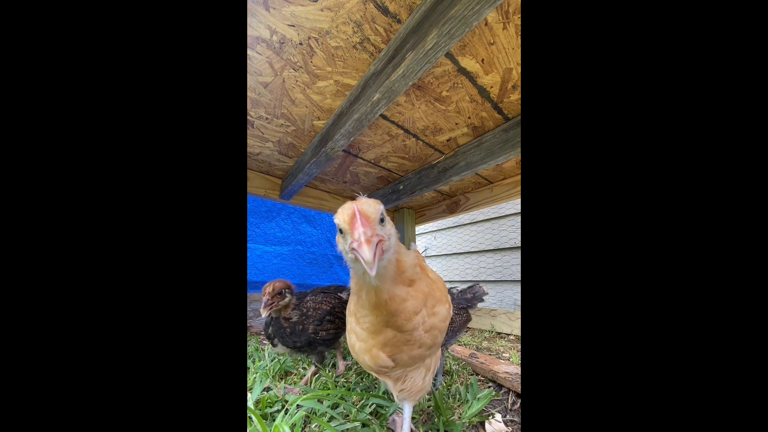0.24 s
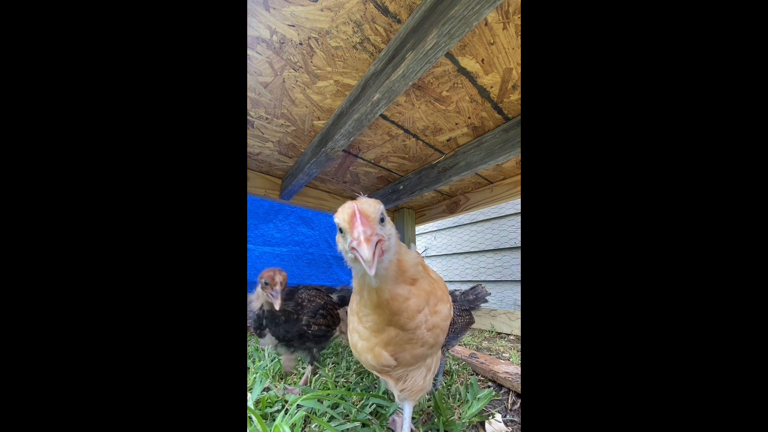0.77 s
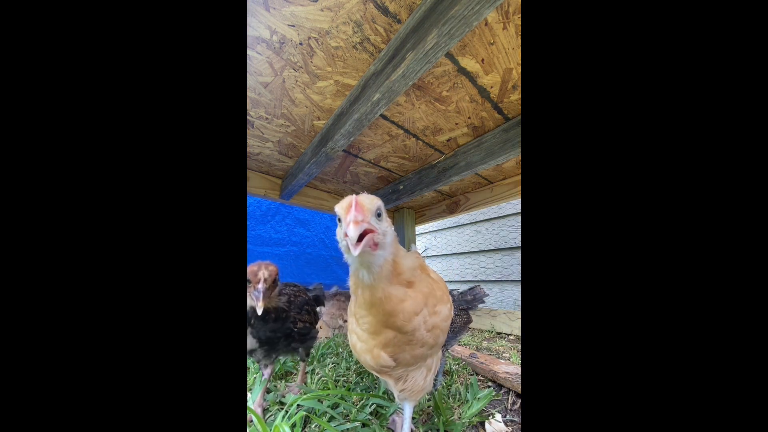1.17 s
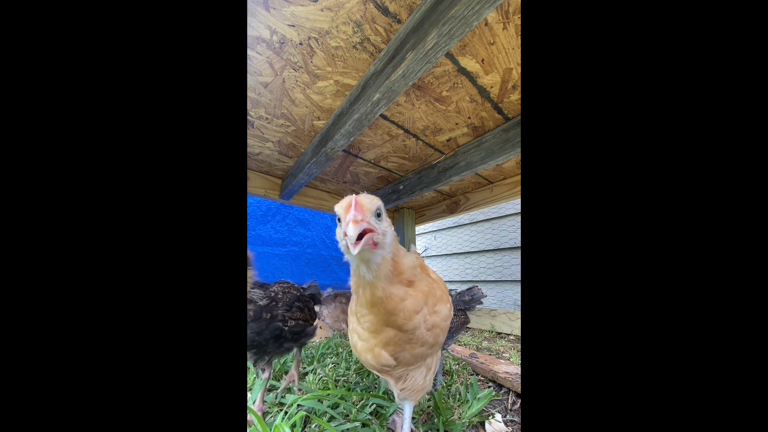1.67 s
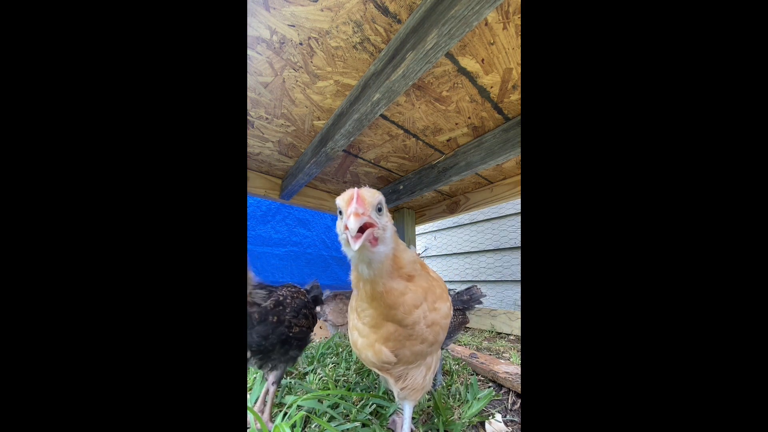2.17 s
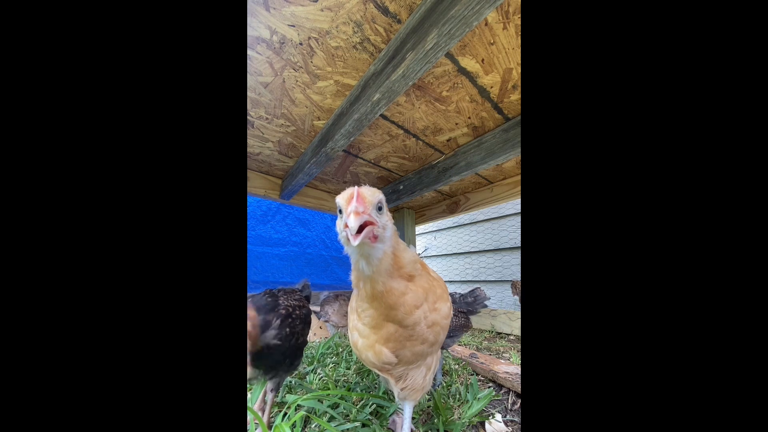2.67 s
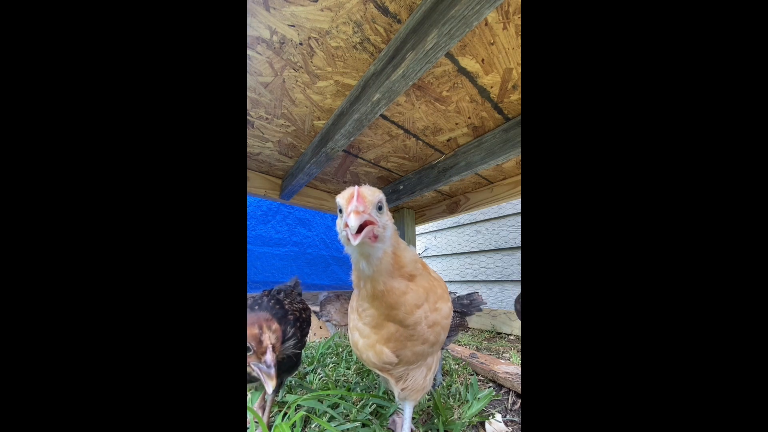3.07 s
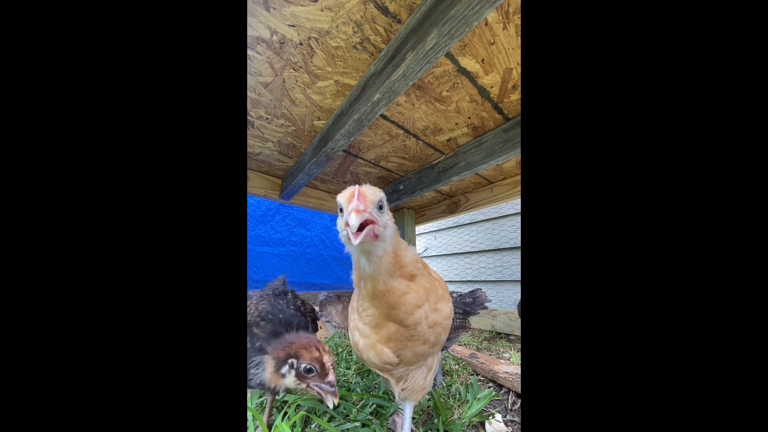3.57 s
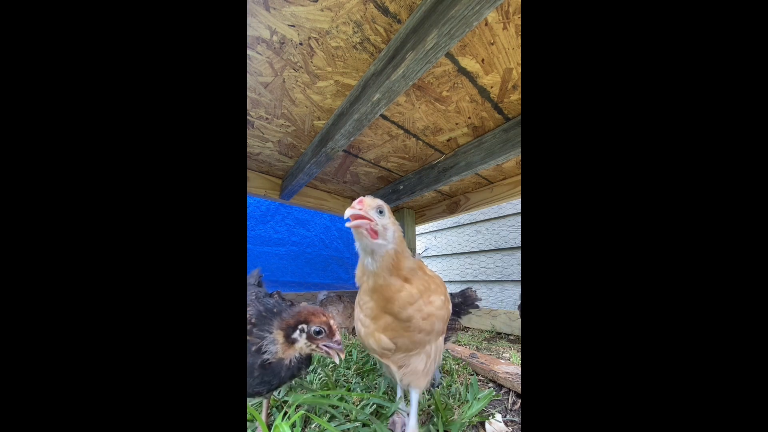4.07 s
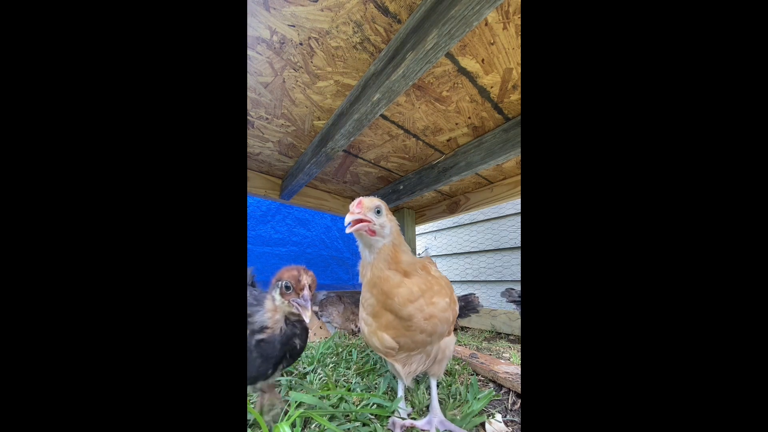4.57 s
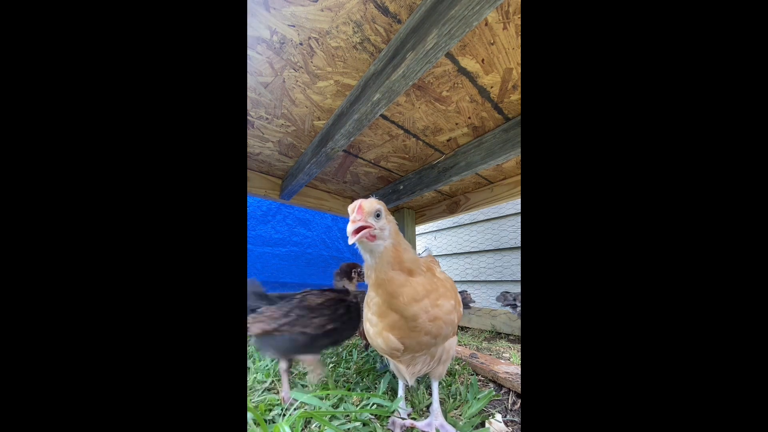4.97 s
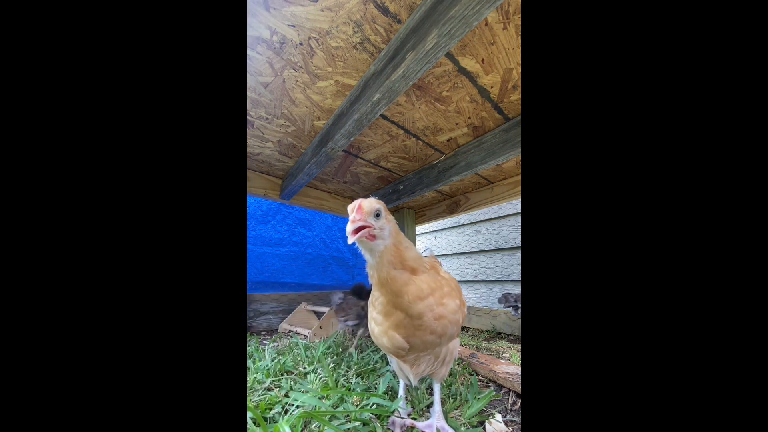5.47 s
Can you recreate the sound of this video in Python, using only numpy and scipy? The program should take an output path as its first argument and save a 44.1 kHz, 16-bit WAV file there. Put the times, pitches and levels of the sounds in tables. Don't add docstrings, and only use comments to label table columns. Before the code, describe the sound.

Young chickens give brief whistled peeps close to the microphone over a steady low hum, with grass rustling and small dry ticks.

```python
import sys
import numpy as np
from scipy import signal
from scipy.fft import rfft, irfft, next_fast_len
from scipy.io import wavfile
from scipy.ndimage import uniform_filter1d

SR = 44100
rng = np.random.default_rng(int(sys.argv[2]) if len(sys.argv) > 2 else 0)


def materialize(psi):
    bounded = np.clip(np.atleast_2d(psi).T, -1, 1)
    quanta = np.round(bounded * 32767).astype(np.int16)
    wavfile.write(sys.argv[1], SR, quanta)


def invert_db(x):
    u = np.asarray(x, float) / 20
    return 10 ** u


N = 252693


def at_hz(points, hz):
    points = np.array(points)
    return np.interp(np.log(hz + 1), np.log(points[:, 0] + 1), points[:, 1])


def drift(rate_hz):
    r = np.exp(-80 * np.pi * rate_hz / SR)
    slow = signal.lfilter([1], [1, -2 * r, r * r], rng.standard_normal(N // 40 + 2002))[2000:]
    return np.interp(np.arange(N) / 40, np.arange(len(slow)), slow / slow.std())


# (frequency [Hz], lead [rad])
PORT_PHASE = [(0, 0), (260, -.3), (690, 2.2), (1200, 2.6), (1720, 1.6), (2600, 2.9), (3880, 1.0),
              (4740, 3.0), (5510, 6.3), (7410, 6.9), (8010, 8.0), (9470, 8.1), (11500, 9.3), (16000, 9.4)]
# (frequency [Hz], likeness [0-1])
PORT_LIKENESS = [(60, 1), (250, 0.72), (520, 0.95), (900, 0.63), (2000, 0.34), (3500, 0.1675), (5000, 0.43),
                 (6500, 0.24), (9000, 0.37), (12000, 0.34)]
# (frequency [Hz], difference [dB])
PORT_BALANCE = [(60, -1.5), (200, -5), (500, -6.5), (1400, 3.5), (3000, -0.5), (5500, -3), (9000, 2.0),
                (12000, 3)]


def diffuse(spectrum, weight, grain_db):
    size = next_fast_len(N)
    hz = np.arange(size // 2 + 1) * SR / size
    grains = rng.standard_normal((2, N)) * invert_db(grain_db * drift(150))
    one, other = rfft(grains, size) * invert_db(at_hz(spectrum, hz)) * weight(hz)
    alike = np.clip(at_hz(PORT_LIKENESS, hz), 0, 1)
    left = alike * one + np.sqrt(1 - alike ** 2) * other
    left = left * np.exp(1j * at_hz(PORT_PHASE, hz))
    tilt = invert_db(at_hz(PORT_BALANCE, hz) / 2)
    out = irfft(np.array([left * tilt, one / tilt]), size)[:, :N]
    return out / out.std()


def seat(mono, pan_db, lag_ms, body_echo=0.86, body_ms=0.15):
    hz = np.arange(len(mono) // 2 + 1) * SR / len(mono)
    echo = 1 + body_echo * np.exp(-2j * np.pi * hz * body_ms / 1000)
    left = echo * np.exp(-2j * np.pi * hz * lag_ms / 1000) * invert_db(pan_db / 2)
    right = 0 * hz + invert_db(-pan_db / 2)
    return irfft(rfft(mono) * np.array([left, right]), len(mono))


# (frequency [Hz], density [dB per Hz])
RUMBLE = [(15, -51.5), (30, -7.5), (45, -2), (80, 4.5), (120, 0), (170, -8), (250, -11), (330, -14.5),
          (470, -12.5), (540, -18), (900, -26.5), (2500, -43.5), (6000, -73.5)]
# (multiple of shaft rate, level [dB])
MOTOR = [(2, -77), (4, -61.5), (5, -66.5), (6, -66.5), (8, -64.5), (10, -75.5), (12, -70), (14, -93),
         (16, -73.5)]
# (multiple of mains rate, level [dB])
MAINS = [(2, -54), (4, -63), (8, -66.5)]
# (frequency [Hz], level [dB])
FAN = [(211.3, -68.5), (254.4, -64.5), (381, -76)]


def cooling_unit(motor_hz=29.505, mains_hz=60.13, rumble_db=-51, wobble_db=1.5, sway_rad=0.46):
    lines = [(k * motor_hz, db) for k, db in MOTOR] + [(k * mains_hz, db) for k, db in MAINS] + FAN
    t = np.arange(N) / SR
    out = invert_db(rumble_db) * diffuse(RUMBLE, np.ones_like, grain_db=1.0)
    waver = np.array([drift(3.36) for _ in range(6)])
    for k, (hz, db) in enumerate(lines):
        turn = 2 * np.pi * (hz * t + rng.random()) + sway_rad * waver[k % 6]
        lead = at_hz(PORT_PHASE, hz)
        tilt = invert_db(at_hz(PORT_BALANCE, hz) / 2)
        ports = np.array([tilt * np.sin(turn + lead), np.sin(turn) / tilt])
        out += np.sqrt(2) * invert_db(db + wobble_db * waver[(k + 3) % 6]) * ports
    return out


# (frequency [Hz], density [dB per Hz])
GRASS = [(450, -3.5), (800, -3.5), (1250, -5.5), (1850, -5.5), (2700, -5), (4200, -9.5), (5500, -10.5),
         (7500, -12), (9000, -14.5), (13200, -16.5), (15000, -17.5)]
# (time [s], level [dB])
YARD = [(0.0, -84.5), (0.4, -75.5), (1.0, -83.5), (1.4, -79.5), (1.901, -77), (2.7, -66.5), (3.05, -66.5),
        (3.5, -67), (4.04, -74), (4.5, -67.5), (5.06, -84), (5.4, -64), (5.73, -67)]
# (time [s], level [dB], low colour over high [dB], rise and fall [ms])
FLICKS = [(0.019, -60, -4, 3.4), (0.045, -59.5, -2.5, 9.8), (0.31, -79.5, -0.5, 7.8),
          (0.588, -69.5, 2.5, 28), (0.823, -75, -3, 16), (1.042, -80.5, -12, 5), (1.154, -69, 4, 5.1),
          (1.282, -73, -11, 5), (1.308, -67, 4, 27), (1.987, -70.5, -8, 9), (2.299, -74.5, -12, 5),
          (2.366, -72, -6, 11), (2.466, -60, -2, 16), (2.799, -65, 2, 6.8), (2.853, -73.5, -10.5, 6.8),
          (3.599, -67.5, -1, 22), (3.655, -62, -5, 5), (3.806, -63, -5.5, 3.8), (4.385, -71, -11, 6.4)]
# (time [s], level [dB], high colour over middle [dB], rise [ms], fall [ms])
STEPS = [(0.675, -74, 4, 43, 16), (0.908, -69, -4.5, 24, 76), (0.99, -80, -2.5, 60, 82),
         (1.622, -59, -11, 173, 54), (1.885, -74.5, -30, 14, 11), (1.957, -73, -9, 4.4, 7.6),
         (4.62, -68.5, -17, 10, 10), (2.024, -61.5, 3, 5.7, 15), (2.156, -64, -27, 12.6, 104),
         (2.686, -67, -23, 4.6, 11), (2.962, -58.5, -39, 11, 30), (3.399, -62, 2, 19, 22),
         (3.735, -60, -4.5, 24, 60), (3.924, -68, -2, 11, 4.4), (4.153, -60.5, -3.5, 58, 33),
         (4.212, -65, -11, 80, 6.4), (4.268, -69.5, 4, 66, 5), (4.375, -65, -3.5, 34, 13),
         (4.55, -63, -7.5, 82, 150), (4.81, -59, -3.5, 32, 83), (5.001, -48.5, -12, 43, 24),
         (5.142, -63, -1, 37, 32), (5.304, -62, -2.5, 66, 28), (5.362, -61.5, -1.5, 9.1, 49),
         (5.493, -64.5, 1, 9.3, 11)]


def below(hz, edge_hz):
    return 1 / (1 + (hz / edge_hz) ** 4)


def grass(yard_middle_db=-3, yard_high_db=-13, flick_middle_db=-14, step_low_db=-2):
    t = np.arange(0, N + 32, 32) / SR
    s, yard_db = np.transpose(YARD)
    colours_db = np.array([[0], [yard_middle_db], [yard_high_db]])
    power = invert_db(2 * (np.interp(t, s, yard_db) + colours_db))
    rustles = [(s, db + low_db, db + flick_middle_db, db, ms, ms) for s, db, low_db, ms in FLICKS]
    rustles += [(s, db + step_low_db, db, db + high_db, rise, fall) for s, db, high_db, rise, fall in STEPS]
    for s, low_db, middle_db, high_db, rise_ms, fall_ms in rustles:
        away = 1000 * np.where(t < s, (s - t) / max(rise_ms, 1), (t - s) / max(fall_ms, 1))
        power += invert_db(2 * (np.array([[low_db], [middle_db], [high_db]]) - 6 * away))
    close = sum(invert_db(db - low_db - 1000 * abs(t - s)) for s, db, low_db, _ in FLICKS)
    times = np.arange(N) / SR
    low, middle, high = (np.interp(times, t, np.sqrt(p)) for p in power)

    low_noise = diffuse(GRASS, lambda hz: np.sqrt(below(hz, 1500)), grain_db=1.5)
    middle_noise = diffuse(GRASS, lambda hz: np.sqrt(below(hz, 17000) * (1 - below(hz, 2600))), grain_db=2.5)
    high_noise = diffuse(GRASS, lambda hz: np.sqrt(1 - below(hz, 11200)), grain_db=2.0)
    out = low * invert_db(3.5 + 0.64 * drift(28.8)) * low_noise
    out += middle * invert_db(-1.44 + 1.3 * drift(42)) * middle_noise
    out += high * invert_db(6.5 + 3.13 * drift(24)) * high_noise
    hiss = np.diff(rng.standard_normal(N + 4), 4) / 8
    return out + np.interp(times, t, close) * invert_db(6.0) * hiss


# (time [s], peak level [dB], pitch [Hz])
TICKS = [(.0395, -45, 11000), (.218, -55, 7500), (.672, -48, 6840), (1.194, -49, 5300), (1.195, -51, 9000),
         (1.256, -43, 9940), (1.308, -48, 6500), (1.77, -48, 2700), (1.772, -50, 1004), (2.059, -56, 3000),
         (1.2545, -46, 12500), (1.283, -50, 8000), (4.626, -54, 3600), (4.092, -54, 6500),
         (4.988, -50, 3600), (4.993, -49, 4000), (5.001, -50, 5300), (5.005, -50, 1500), (2.021, -38, 9100),
         (2.022, -47, 2600), (2.297, -52, 11100), (2.368, -51, 8000), (2.452, -47, 12000),
         (3.231, -46, 4300), (.646, -54, 6000), (.537, -55, 7000), (2.785, -53, 10000), (2.686, -55, 7000),
         (1.475, -50, 14500), (3.6495, -40, 13000), (3.653, -40, 8860), (3.807, -44, 13000),
         (3.717, -47, 4000), (3.719, -39.5, 374), (3.797, -47, 11000), (3.923, -44, 8800),
         (4.062, -48, 7000), (4.21, -40, 3560), (4.2105, -43, 6100), (4.211, -42, 1200), (4.263, -45, 1300),
         (4.27, -38, 7400), (4.378, -43, 7000), (4.618, -50, 5100)]


def ticks(cycles=3.0):
    out = np.zeros((2, N))
    t = np.arange(1024) / SR
    for s, db, hz in TICKS:
        puff = hz / 12000 * np.diff(rng.standard_normal(1024), prepend=0)
        snap = (np.sin(2 * np.pi * hz * t) + puff) * np.exp(-np.log(1000) * t * hz / cycles / 2)
        lead_in = np.roll(invert_db(db) * snap, 24)
        out[:, round(s * SR) - 24:][:, :1024] += seat(lead_in, pan_db=-10.0, lag_ms=-0.028)
    return out


# (time [s], pitch [Hz], level [dB])
DIPS = [
    [(0.403, 2700, -100), (0.416, 2660, -39.5), (0.4229, 2640, -41), (0.4309, 2276, -34.5),
     (0.4399, 2170, -37.5), (0.4494, 2350, -34.5), (0.4555, 2750, -43), (0.4625, 2790, -48),
     (0.476, 2700, -72)],
    [(1.238, 2090, -85), (1.25, 2120, -54), (1.26, 2176, -45.5), (1.268, 2230, -59), (1.272, 2470, -52),
     (1.28, 2515, -52), (1.287, 2460, -54), (1.293, 2480, -57), (1.306, 2540, -76)],
    [(3.213, 2280, -80), (3.223, 2440, -40), (3.234, 2430, -32), (3.241, 2310, -40.5), (3.248, 2290, -49),
     (3.261, 2350, -32), (3.268, 2600, -50), (3.2778, 2760, -52), (3.2943, 2550, -78)],
    [(4.786, 2520, -76), (4.791, 2600, -46), (4.801, 2730, -50), (4.808, 2536, -34.5), (4.816, 2460, -34),
     (4.829, 2450, -27), (4.839, 2580, -42), (4.849, 3330, -51), (4.8643, 3020, -75)],
]
# (time [s], pitch [Hz], level [dB])
FALLS = [
    [(2.561, 2170, -87), (2.574, 2204, -42.5), (2.58, 2250, -60), (2.587, 2530, -47), (2.594, 2690, -43),
     (2.6, 3020, -65), (2.607, 2910, -57), (2.611, 2660, -47), (2.619, 2650, -79)],
    [(1.029, 2710, -95), (1.035, 2800, -75), (1.042, 2920, -71), (1.047, 2760, -73), (1.052, 2650, -95)],
    [(4.482, 3620, -69), (4.493, 3630, -46), (4.499, 3662, -24), (4.518, 3564, -25), (4.534, 3250, -24),
     (4.542, 2890, -35), (4.547, 2840, -37), (4.558, 2980, -74), (4.572, 2900, -82)],
    [(5.017, 2039, -77), (5.022, 2080, -55), (5.029, 2110, -34), (5.0335, 2064, -36), (5.0365, 1970, -62),
     (5.047, 1992, -45), (5.051, 1970, -73), (5.058, 2020, -53), (5.067, 2000, -75)],
    [(5.036, 2032, -70), (5.0385, 1975, -43), (5.041, 1993, -34.5), (5.046, 1980, -44), (5.051, 2000, -72)],
    [(5.435, 2700, -77), (5.449, 2380, -57), (5.4534, 2550, -51.5), (5.4694, 2140, -84)],
]
# (time [s], pitch [Hz], level [dB])
TRILL = [
    [(1.3975, 3460, -84), (1.402, 4200, -41.5), (1.408, 4460, -38), (1.416, 4490, -30),
     (1.419, 4500, -23.5), (1.4215, 4000, -29.5), (1.4235, 3270, -20.5), (1.4256, 3210, -16.5),
     (1.4278, 4160, -30)],
    [(1.431, 4420, -25.5), (1.4355, 4470, -31), (1.4388, 4470, -28.5), (1.4415, 3980, -34.5),
     (1.4442, 2844, -19), (1.4478, 2770, -34.5), (1.4508, 3090, -19.5), (1.4532, 3320, -22),
     (1.4563, 3300, -51)],
    [(1.4585, 3960, -34), (1.4605, 3830, -38), (1.4624, 3220, -56), (1.464, 3070, -48.5),
     (1.467, 3120, -77)],
]
# (time [s], pitch [Hz], level [dB])
RISES = [
    [(3.58, 2066, -75), (3.585, 2084, -55), (3.592, 2260, -39), (3.605, 2393, -32), (3.61, 2520, -43),
     (3.615, 2770, -47), (3.619, 2830, -62), (3.627, 2750, -44), (3.642, 2860, -70)],
    [(4.08, 2080, -70), (4.085, 2160, -47), (4.092, 2345, -37.5), (4.103, 2370, -51), (4.108, 2480, -35),
     (4.112, 2630, -57), (4.116, 2840, -44), (4.121, 2970, -52), (4.126, 3000, -70)],
    [(4.347, 2120, -70), (4.351, 2130, -54.5), (4.356, 2246, -68), (4.361, 2330, -30.5),
     (4.371, 2453, -32.5), (4.376, 2620, -40.5), (4.38, 2710, -55), (4.386, 2880, -54), (4.41, 2720, -69)],
    [(4.628, 2270, -77), (4.638, 2350, -60), (4.642, 2420, -50), (4.6505, 2590, -49), (4.658, 2710, -55),
     (4.662, 3050, -62), (4.668, 3250, -68), (4.676, 3350, -75)],
]
# (time from the weak spot [ms], pitch [Hz], level [dB])
ARCH = [(-10, 1300, -70), (-11.5, 1600, -5), (-2.5, 2500, 1.5), (-5.5, 2830, -28), (2.5, 3290, -9),
        (11, 3540, -11), (34.5, 3050, -8.5), (45, 2246, 1.5), (60.5, 2160, -55)]
# (time [s], length share, pitch share, level [dB], swell [dB per s])
ARCHES = [
    (3.7331, 1, 0.98, -34, 77),
]
# (time [s], pitch [Hz], level [dB])
ROUGH_ARCH = [
    [(4.1163, 1496, -59), (4.119, 1627, -34.5), (4.122, 1890, -29), (4.1238, 2060, -34),
     (4.1256, 2190, -26.5), (4.1285, 2530, -59), (4.131, 3025, -35.5), (4.136, 3260, -46),
     (4.139, 3330, -52)],
    [(4.144, 3290, -50), (4.148, 3210, -44), (4.153, 2970, -38.5), (4.156, 2840, -40), (4.158, 2570, -42),
     (4.161, 2380, -32), (4.1645, 2270, -50), (4.1672, 2220, -28.5), (4.1695, 2110, -48)],
    [(4.1715, 2190, -36), (4.176, 2200, -49), (4.182, 2210, -55), (4.186, 2170, -68), (4.198, 2190, -82)],
]
# (time [s], pitch [Hz], level [dB])
SYLLABLES = [
    [(5.527, 2530, -78), (5.534, 2680, -63), (5.542, 2940, -50), (5.546, 3350, -53), (5.551, 2920, -49),
     (5.5535, 2800, -75)],
    [(5.55, 2960, -75), (5.555, 2720, -37.5), (5.559, 2483, -41), (5.5645, 2510, -33), (5.569, 2510, -33),
     (5.574, 2420, -57), (5.578, 2326, -75)],
    [(5.575, 2320, -78), (5.581, 2310, -46), (5.5875, 2254, -32), (5.5905, 2096, -41), (5.601, 2190, -45),
     (5.607, 2435, -64), (5.617, 2490, -39.5), (5.625, 2543, -47), (5.64, 2463, -89)],
]


def calls():
    arches = []
    for s, length, pitch, arch_db, swell_db in ARCHES:
        arches.append([(s + length * ms / 1000, pitch * hz, arch_db + shape_db + swell_db * ms / 1000)
                       for ms, hz, shape_db in ARCH])
    breaths = [sum(TRILL, []), sum(ROUGH_ARCH, [])]
    return sorted(RISES + arches + breaths + SYLLABLES + DIPS + FALLS, key=lambda rows: rows[0][0])


# (left over right [dB], left lag [ms], second partial over first [dB], third over second [dB])
SEATS = [(1.5, -0.197, -25, -11.5), (-3, 0.24, -30, -10), (-8.5, 0.2, -21, -20), (-5.5, -0.285, -30, -11),
         (-4, 0.164, -20, -21), (2.5, 0.602, -20, -8), (-5, 0.553, -28, -24), (2, -0.589, -17.5, -17),
         (-5, 0.53, -27, -6), (4.5, -0.07, -10.5, -32), (-5, 0.57, -26, -24.5), (-1.5, -0.034, -56, 8),
         (-2, 0.066, -18, -17), (-2.5, 0.21, -31, -21), (-12, -0.19, -20, -29), (7.5, 0.06, -15, -25),
         (-5, 0.19, -32, -3), (-1, -0.13, -40, -12), (-3, -0.154, -25.5, -4), (-5, -0.14, -16, -15.5)]
# (start [s], end [s], half-pitch level [dB], pitch-and-a-half level [dB], pitch share)
CLUCKS = [
    (1.254, 1.277, -54, -65, 1.0),
    (3.589, 3.609, -50.5, -56, 1.0),
    (4.086, 4.108, -49.5, -56, 1.0),
    (5.597, 5.611, -48.5, -59.5, 1.06),
]
# (frequency [Hz], gain [dB])
BEAK = [(3300, -18.5), (4300, -4), (5000, -5.5), (5800, 3.5), (6600, 6.5), (7300, 5.5), (7900, 0),
        (8800, 8), (10200, 0), (12600, 17.5), (14000, 12.5)]


def peeps(jitter=.003, shimmer_db=.6, glide_hz_per_s=150000, upper_rough=.5, fourth_db=-12):
    out, size = np.zeros((2, N)), 8192
    shake, shimmer = drift(430), drift(110)
    for rows, (pan_db, lag_ms, second_db, third_db) in zip(calls(), SEATS):
        s, hz, db = np.transpose(rows)
        at = round(s[0] * SR) - 400 + np.arange(size)
        at = at[at < N]
        t = at / SR
        pitch = uniform_filter1d(np.interp(t, s, hz), size=44) * (1 + jitter * shake[at])
        turn = 2 * np.pi * np.cumsum(pitch) / SR
        level = uniform_filter1d(np.interp(t, s, invert_db(db / 2), 0, 0) ** 2, size=60)

        upper = uniform_filter1d(level, size=400) * invert_db(second_db + 2.2 * shimmer[at - 900])
        glide = uniform_filter1d(np.gradient(pitch), size=100) * SR / glide_hz_per_s
        upper = upper * (1 + upper_rough * shake[at - 500]) / (1 + glide ** 2)
        second = invert_db(at_hz(BEAK, 2 * pitch)) * np.sin(2 * turn)
        third = invert_db(third_db + at_hz(BEAK, 3 * pitch)) * np.sin(3 * turn)
        fourth = invert_db(third_db + fourth_db + at_hz(BEAK, 4 * pitch)) * np.sin(4 * turn)
        fourth = fourth * (4 * pitch < SR / 2)
        voice = level * np.sin(turn) + upper * (second + third + fourth)

        for start, end, half_db, over_db, share in CLUCKS:
            swell = np.sin(np.pi * np.clip((t - start) / (end - start), 0, 1))
            half = invert_db(half_db) * np.sin(share * turn / 2)
            over = invert_db(over_db) * np.sin(share * 3 * turn / 2)
            voice += (level > 0) * swell * (half + over)
        voice *= np.sqrt(2) * invert_db(shimmer_db * shimmer[at])
        out[:, at] += seat(np.pad(voice, (0, size - len(at))), pan_db, lag_ms)[:, :len(at)]
    return out


# (start [s], end [s], level [dB])
RASPS = [(.71, .734, -66), (2.595, 2.63, -59), (2.905, 2.926, -65), (3.266, 3.292, -54),
         (3.612, 3.648, -54), (4.104, 4.17, -45), (4.374, 4.412, -54), (4.652, 4.685, -60),
         (4.84, 4.87, -54), (4.79, 4.806, -56), (.456, .482, -64), (2.05, 2.07, -66), (.885, .905, -67),
         (4.545, 4.575, -61)]


def rasps():
    t = np.arange(N) / SR
    swell = sum(invert_db(db) * np.sin(np.pi * np.clip((t - start) / (end - start), 0, 1))
                for start, end, db in RASPS)
    windpipe = signal.butter(4, [2350, 3300], "band", fs=SR, output="sos")
    air = signal.sosfilt(windpipe, rng.standard_normal(N))
    return seat(swell * air / air.std(), pan_db=-2.5, lag_ms=.53)


def shelter(near, t60_s=.042, dull_hz=5000, first_ms=4.0):
    t = np.arange(8192) / SR
    cloud = rng.standard_normal((2, 8192)) * invert_db(-60 * t / t60_s) * (t > first_ms / 1000)
    cloud = signal.sosfilt(signal.butter(1, dull_hz, fs=SR, output="sos"), cloud)
    cloud /= np.sqrt(np.sum(cloud ** 2, axis=1, keepdims=True))
    return signal.oaconvolve(near[1:], cloud, axes=1)[:, :N]


# (time [s], level [dB], half length [s])
WHEEZES = [(1.574, -65, 0.09), (1.5, -66, 0.004), (1.547, -66, .005), (1.557, -59, .005),
           (1.602, -62, 0.0044), (1.625, -55, .006), (1.652, -58.5, 0.0057), (2.145, -69, 0.0078),
           (2.912, -68.5, 0.013), (5.043, -56.5, 0.007), (1.234, -78, .005)]


def wheeze(hz=7700, width_hz=900):
    t = np.arange(N) / SR
    swell = sum(invert_db(db) * np.exp(-((t - s) / half) ** 4) for s, db, half in WHEEZES)
    flat = [(100, 0), (16000, 0)]
    return swell * diffuse(flat, lambda f: 1 / (1 + (2 * (f - hz) / width_hz) ** 2), grain_db=4.0)


def scene():
    near = peeps() + ticks() + rasps()
    echoes = invert_db(-27) * shelter(near)
    return near + echoes + grass() + wheeze() + cooling_unit()


def top_cut(x):
    return signal.sosfilt(signal.butter(12, 16450, fs=SR, output="sos"), x)


def record(dry):
    hz = np.arange(N // 2 + 1) * SR / N
    fade = invert_db(-24 / (1 + (13000 / (hz + 1)) ** 6))
    top = hz < 15850
    both = irfft(rfft(dry[0] + dry[1]) * fade * top, N) / 2
    apart = irfft(rfft(dry[0] - dry[1]) * top, N) / 2
    mix = np.array([both + apart, both - apart])
    return top_cut(mix)


dry = scene()
out = record(dry)
materialize(out)
```